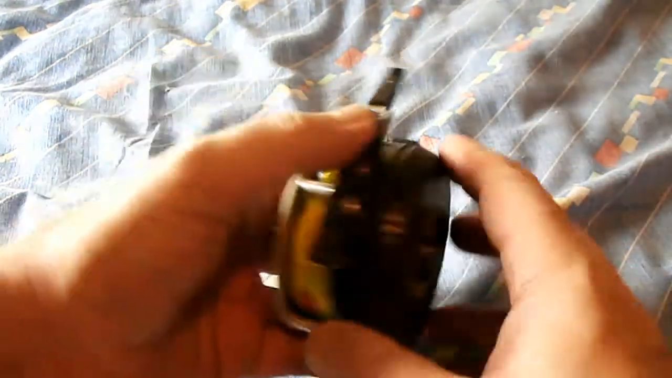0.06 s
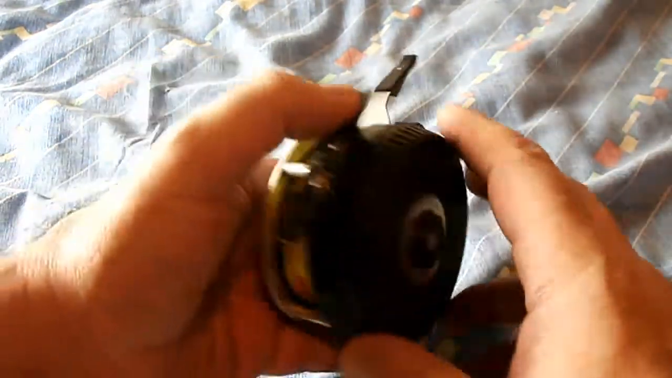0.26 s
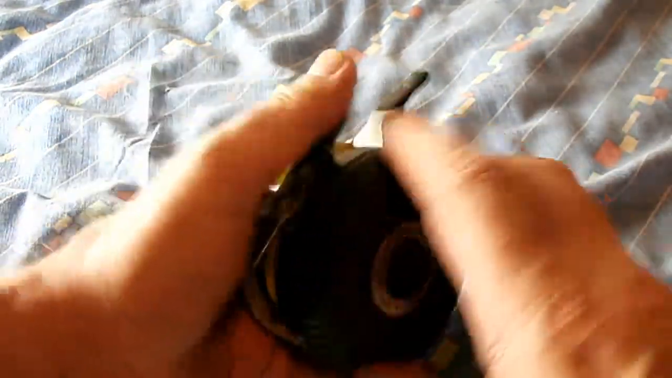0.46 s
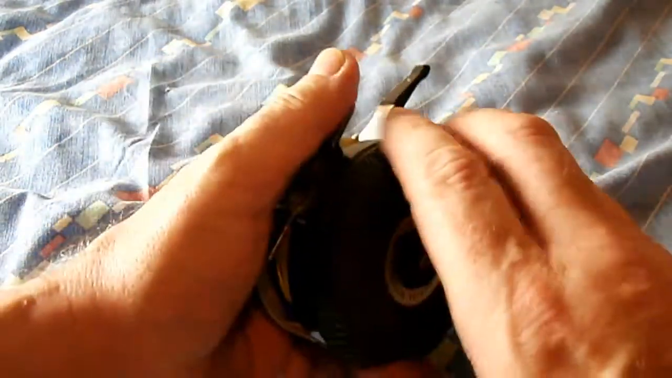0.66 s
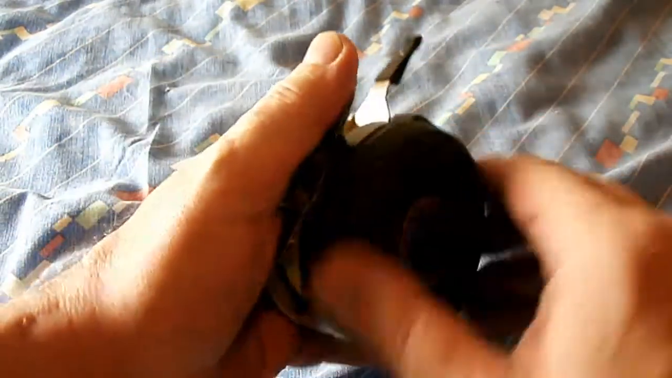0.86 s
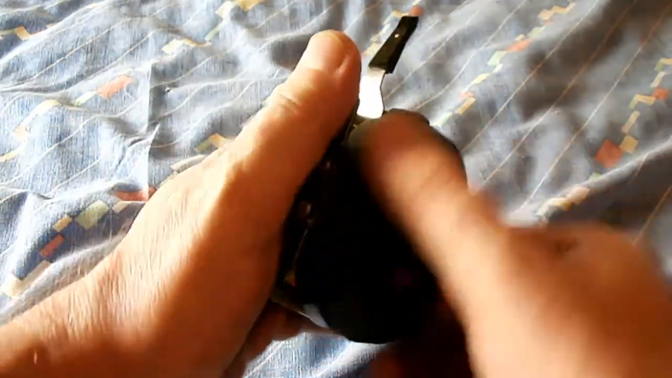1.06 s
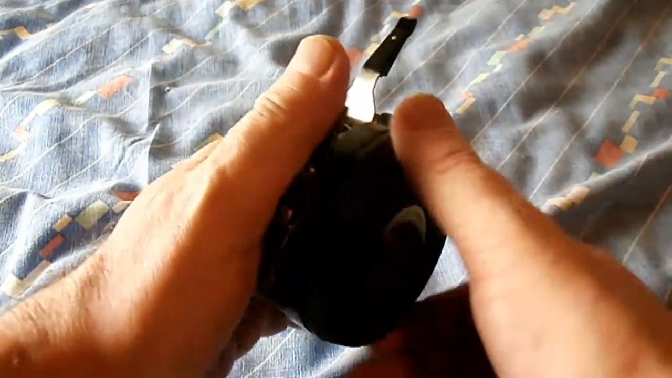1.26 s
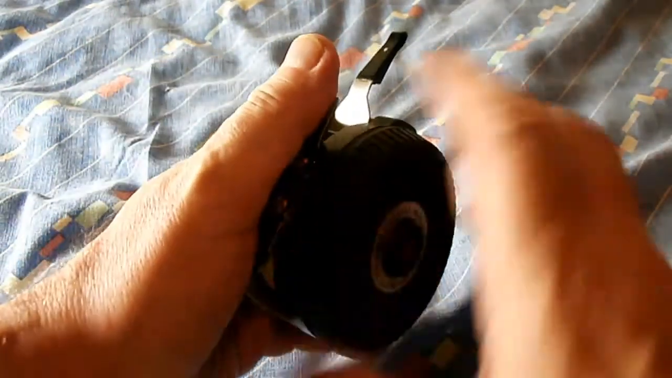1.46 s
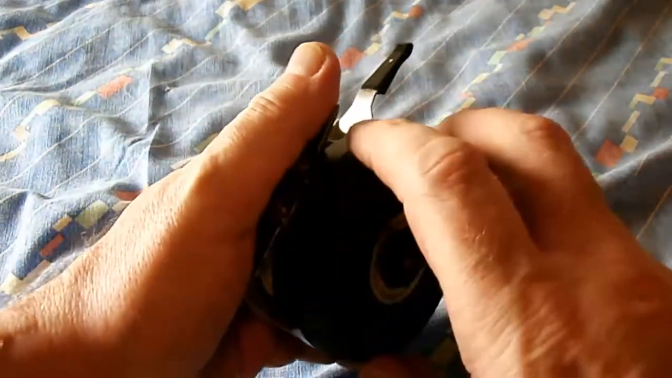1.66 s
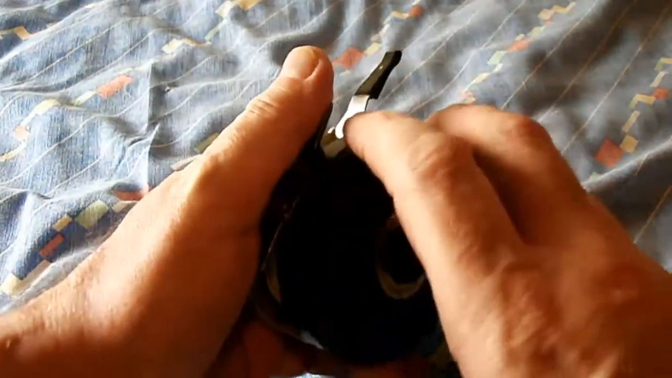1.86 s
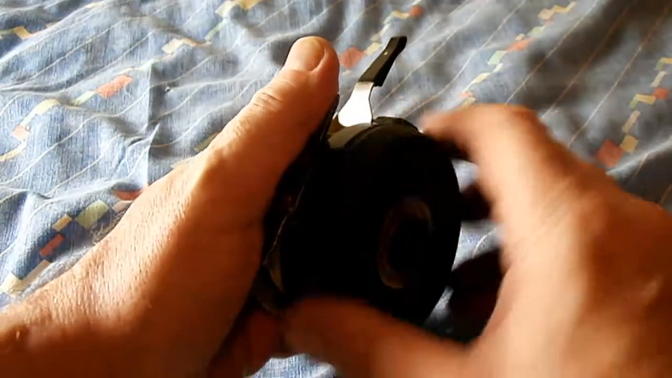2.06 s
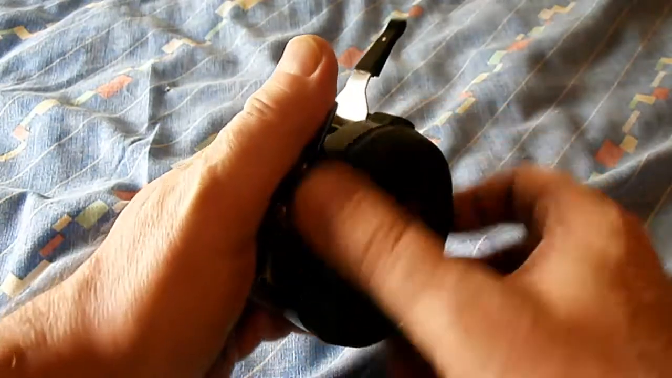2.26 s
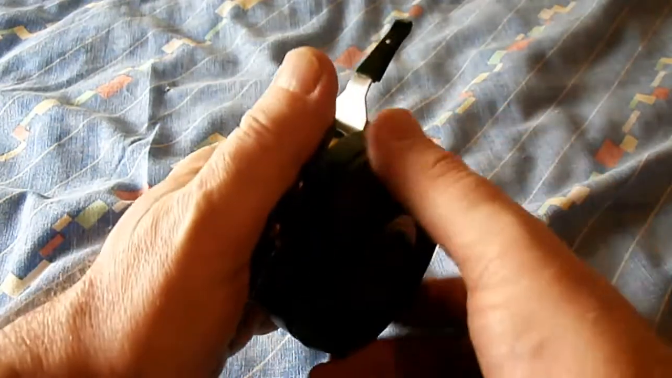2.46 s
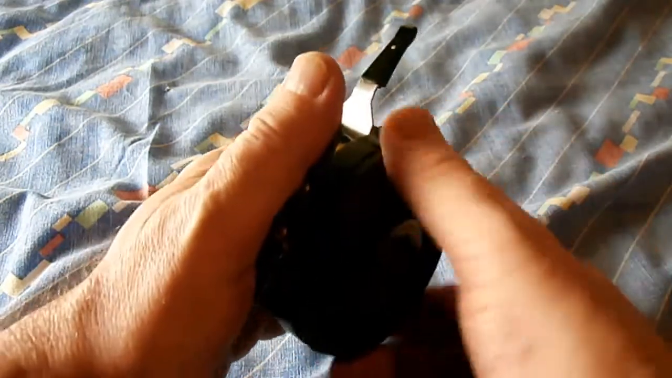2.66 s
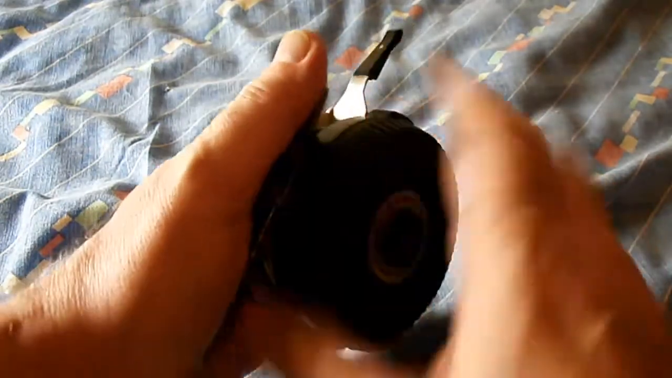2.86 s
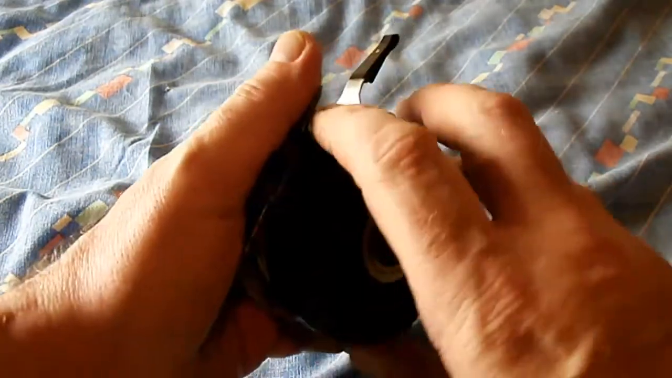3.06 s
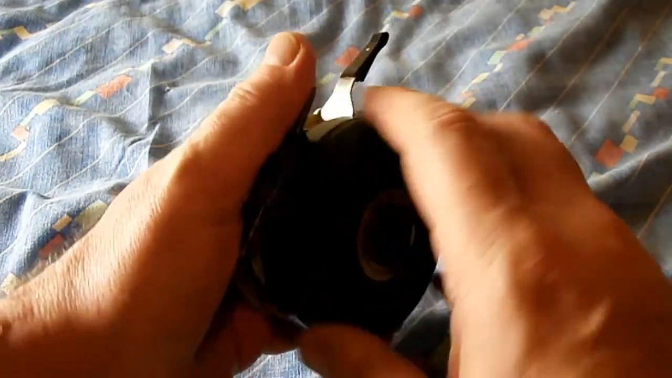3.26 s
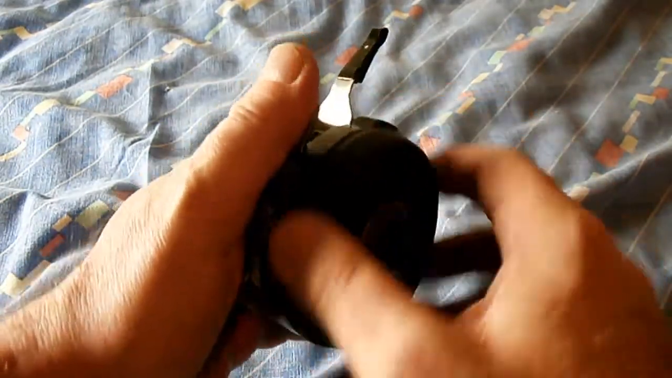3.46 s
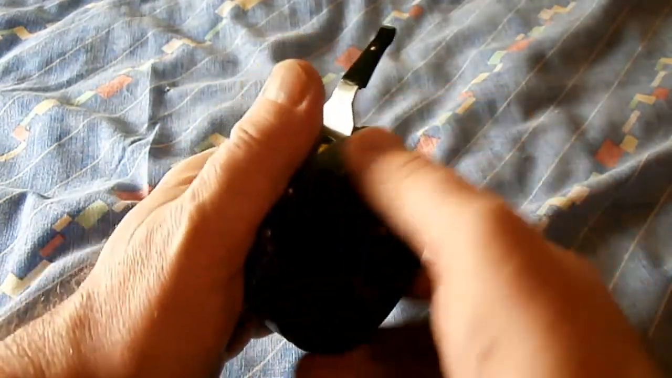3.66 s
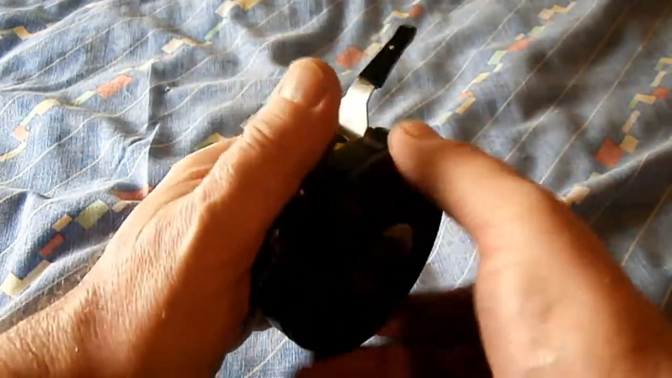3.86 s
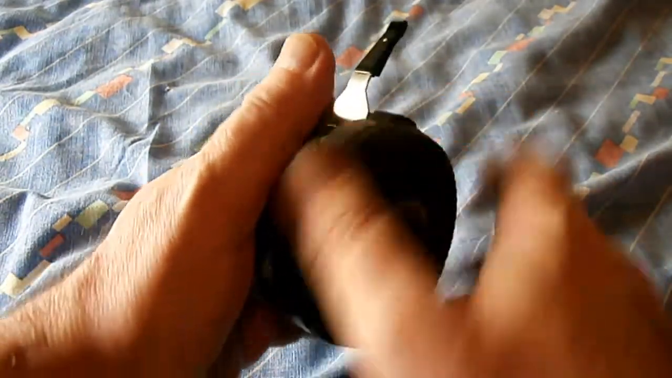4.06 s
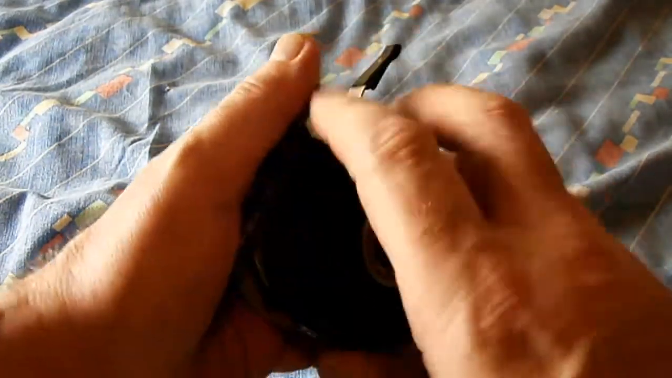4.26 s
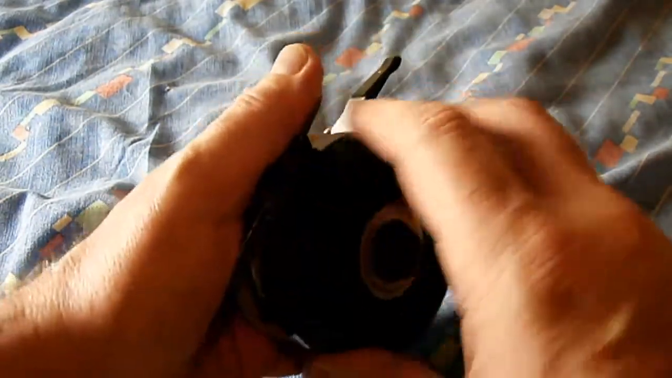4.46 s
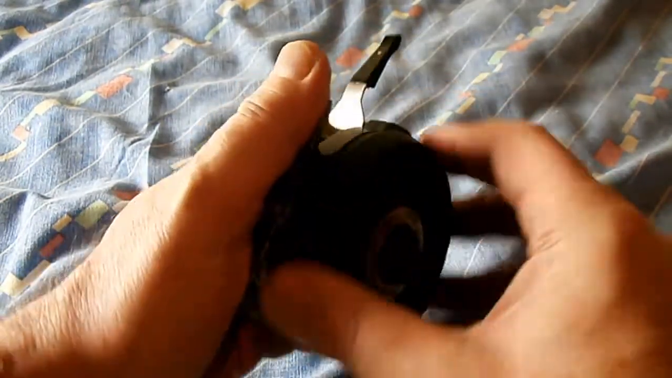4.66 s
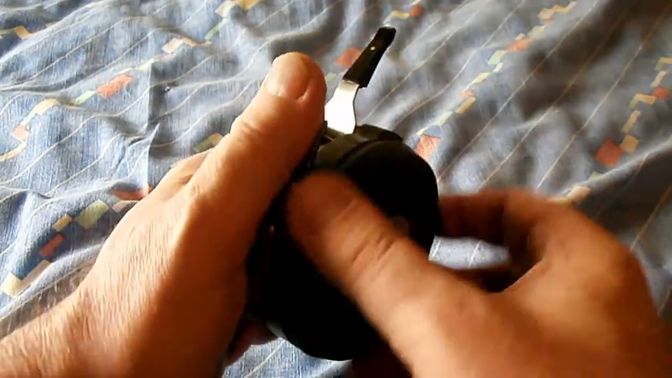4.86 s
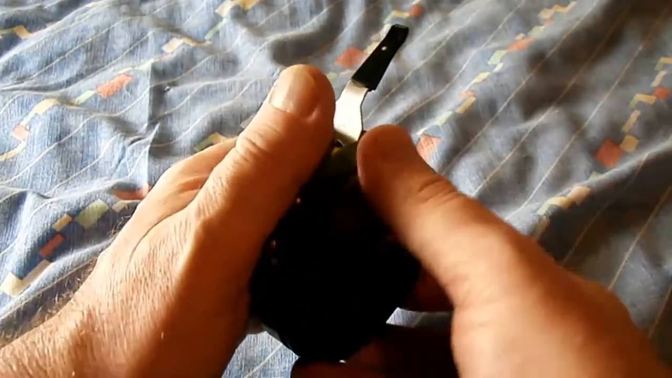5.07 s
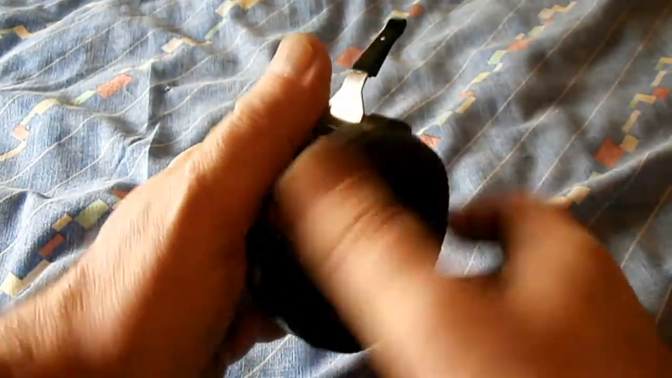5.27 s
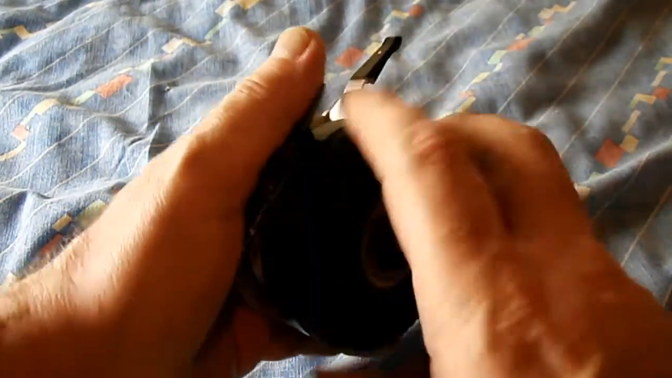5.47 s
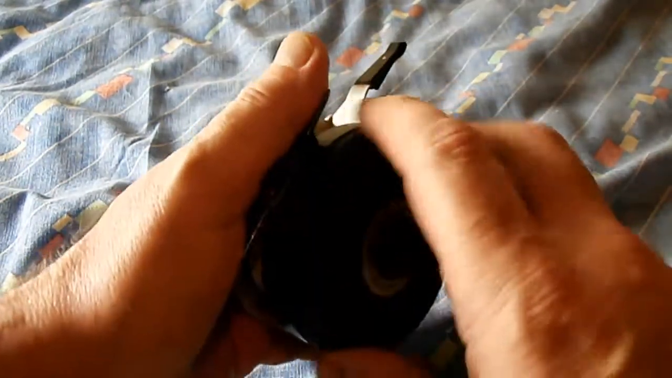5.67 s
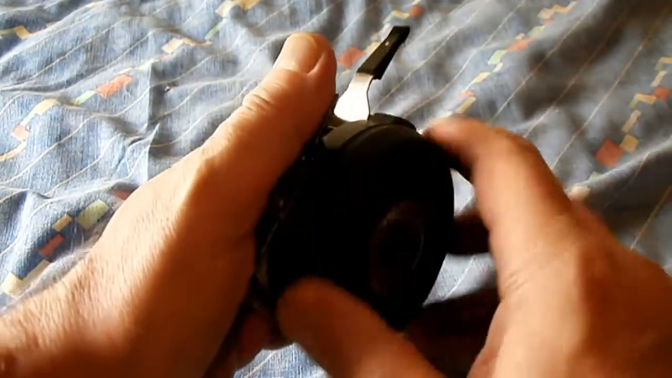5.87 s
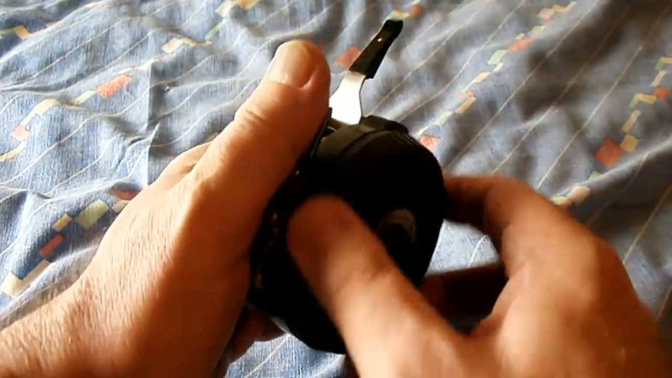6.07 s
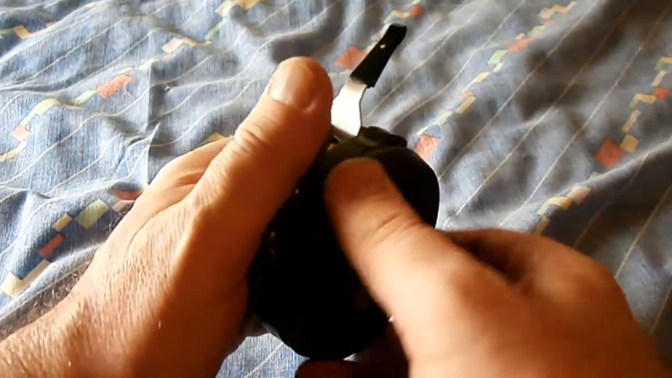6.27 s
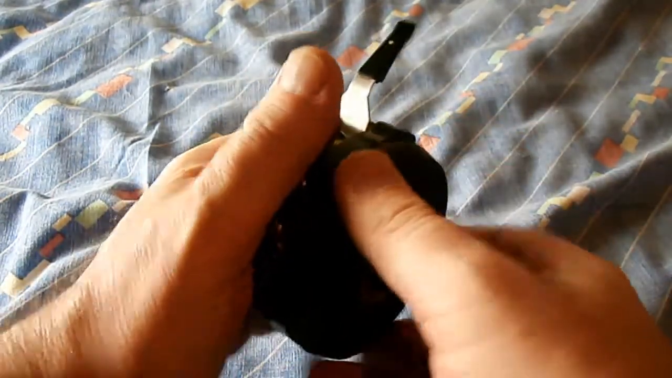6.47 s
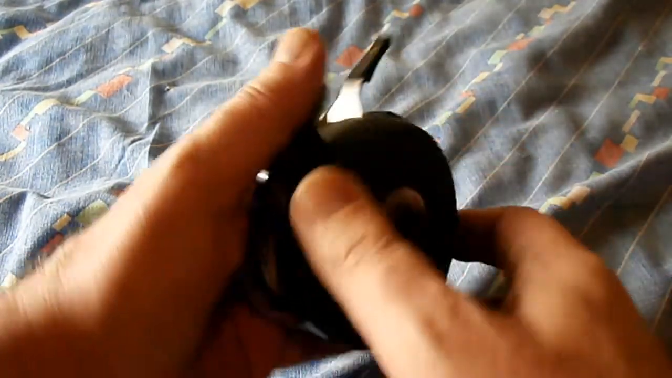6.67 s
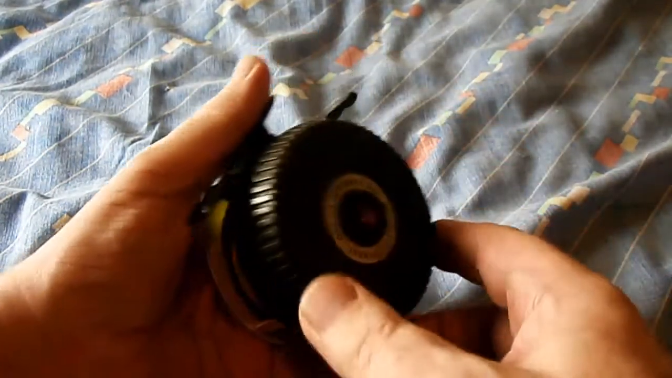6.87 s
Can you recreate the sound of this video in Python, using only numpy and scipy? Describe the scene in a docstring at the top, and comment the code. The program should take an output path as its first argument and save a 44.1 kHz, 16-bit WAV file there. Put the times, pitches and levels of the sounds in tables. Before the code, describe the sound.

Very close to a small camera microphone, a spring-driven fishing reel is turned by hand in five short bursts. Each burst is a rapid run of bright, hard steel clicks with a slight metallic ring and tiny rebound. Between bursts fingers rub the case and loose metal taps softly. The furnished room gives a short, soft echo over faint hum, hiss and a thin high whine.

```python
"""Fishing reel turned by hand

A spring-driven fishing reel is turned in five short bursts, close to a small camera in a furnished room.
A steel pawl snaps over each ratchet tooth and rebounds; the case rings at a pitch that wanders as it turns.
Fingers rub the case, and the loose case taps as the grip changes; the room adds a short, soft echo.
The microphone overloads on the snaps with a dull pop and rounded peaks, over hum, hiss and a faint camera whine."""
import sys
import numpy as np
from scipy import signal
from scipy.fft import rfft, irfft, next_fast_len
from scipy.io import wavfile
from scipy.ndimage import uniform_filter1d, map_coordinates

SR = 44100
rng = np.random.default_rng(int(sys.argv[2]) if len(sys.argv) > 2 else 0)


def int16_out(signal):
    """Quantize to a 16-bit WAV file."""
    q = np.round(np.clip(np.atleast_2d(signal).T, -1, 1) * 32767)
    wavfile.write(sys.argv[1], SR, q.astype(np.int16))


N = 305613


def amp(db):
    """Decibels to gain."""
    return 10 ** (np.asarray(db) / 20)


def unit(x):
    """Each row at rms 1."""
    return x / np.sqrt(np.mean(x ** 2, axis=-1, keepdims=True) + 1e-20)


def along(points, hz):
    """(frequency, value) points interpolated on a log frequency axis."""
    f, values = np.transpose(points)
    return np.interp(np.log(hz + 1), np.log(np.maximum.accumulate(f) + 1), values)


def add(track, s, sound):
    """Mix a sound into the track at time s."""
    start = max(0, round(s * SR))
    part = track[..., start:start + sound.shape[-1]]
    part += sound[..., :part.shape[-1]]


def filtered(x, gain):
    """x times a gain that is a function of frequency."""
    size = next_fast_len(N + 8192)
    hz = np.fft.rfftfreq(size, 1 / SR)
    return irfft(rfft(x, size) * gain(hz), size)[..., :N]


def noise(spectrum):
    """Steady coloured noise of rms 1."""
    white = rng.standard_normal(N)
    return unit(filtered(white, lambda hz: amp(along(spectrum, hz))))


def through(x, gain_db):
    """Rows of x through a minimum-phase filter with the given gain, so that nothing sounds early."""
    size = x.shape[-1]
    cepstrum = irfft(np.log(amp(gain_db)), size)
    # fold the cepstrum onto positive time
    cepstrum[..., 1:size // 2] *= 2
    cepstrum[..., size // 2 + 1:] = 0
    return irfft(rfft(x) * np.exp(rfft(cepstrum)), size)


def background():
    """Quiet room hum and microphone hiss as coloured noise, with the camera's steady tones as sines."""
    # colour of hum and hiss: (frequency [Hz], relative level [dB])
    air = [(20, -11), (50, -11.5), (90, -3.5), (150, -1.5), (300, -3.5), (600, -7.5), (1200, -13.5),
           (2200, -17.5), (4000, -18), (6000, -21.5), (8500, -18), (10100, -13.5), (12000, -24.5),
           (15500, -19)]
    # steady tones: (frequency [Hz], rms level [dB])
    whine = [(120, -95), (3261, -78), (3399, -83.5), (4066, -84), (14890, -84), (14947, -61),
             (15004, -71.5), (15175, -85)]
    t = np.arange(N) / SR
    tones = np.zeros(N)
    for hz, db in whine:
        tones += amp(db) * np.sqrt(2) * np.sin(2 * np.pi * (hz * t + rng.random()))
    return amp(-60.5) * noise(air) + tones


def room(x, build_s, count):
    """Reflections build up, then die at a rate set by pitch; they change as the hands move."""
    # decay of the reflections: (frequency [Hz], t60 [s])
    decay = [(200, 0.1), (1500, 0.17), (3500, 0.24), (7300, 0.19), (10000, 0.19), (15000, 0.14)]
    out = np.zeros(N)
    slice_size = N // count + 1
    # each slice of the input gets a fresh random tail
    for start in np.arange(count) * slice_size:
        hz, age, cells = signal.stft(rng.standard_normal(SR // 3), SR, nperseg=256)
        fade = amp(-60 * age / along(decay, hz)[:, None])
        build = 1 - np.exp(-age / build_s)
        tail = signal.istft(cells * fade * build, SR, nperseg=256)[1]
        tail = tail / np.linalg.norm(tail)
        add(out, start / SR, signal.fftconvolve(x[start:start + slice_size], tail))
    return out


def rubbing(grain_db, grain_rate):
    """The drum slides under the fingers: the contact catches and slips in tiny grains of noise."""
    # strokes: (start [s], end [s], level [dB])
    rubs = [(0.33, 0.38, -66), (1.087, 1.148, -45), (1.919, 1.962, -53), (2.226, 2.328, -52),
            (2.81, 2.848, -61), (3.143, 3.218, -59), (3.796, 3.955, -62), (4.02, 4.133, -63.5),
            (4.434, 4.493, -58), (4.793, 5.035, -50.5), (5.135, 5.16, -44.5), (5.17, 5.22, -61),
            (5.32, 5.354, -60.5), (5.64, 5.693, -59), (6.438, 6.505, -52.5)]
    # colour of the sliding: (frequency [Hz], relative level [dB])
    slide = [(200, -17), (600, 0.5), (1000, 3.5), (1500, -3), (2300, 0), (3200, 9.5), (4500, 0), (7200, 4),
             (9000, -2), (15000, -26)]
    t = np.arange(N) / SR
    stroke = np.zeros(N)
    for start, end, db in rubs:
        # 23 ms ramps, half open at the start and end times
        stroke += amp(db) * np.clip(np.minimum(t - start, end - t) / 0.023 + .5, 0, 1)
    grains = map_coordinates(rng.standard_normal(N), [t * grain_rate], order=1)
    return stroke * unit(noise(slide) * amp(grain_db * grains))


def contacts(rows, rebound_s, ring_width_hz, steel_width_hz=700, steel_peak_db=6, size=1024):
    """One chattering blow and rebound per row, filtered as steel, case, knock and edge: (direct, to the room)."""
    # colours of the four parts: (frequency [Hz], relative level [dB])
    steel_colour = [(3700, -28.5), (4500, -4), (5000, -7), (5300, -1), (5560, -5), (5870, -3), (6350, -5),
                    (6950, 3), (7400, 0.5), (8100, -2.5), (8650, -0.5), (9400, -8), (10800, -23.5)]
    case_band = [(2100, -21.5), (2750, -5), (3100, 3.5), (4400, 0), (5200, -4), (6500, -31.5)]
    knock_colour = [(60, -60), (300, -27), (560, -6.5), (800, -1.5), (1100, 2), (1450, -6.5), (1950, 5.5),
                    (2500, 5), (3100, -7), (4500, -48)]
    edge_colour = [(8000, -29.5), (9300, 3), (10100, 7), (10650, 10), (11500, 1.5), (12800, -4),
                   (14300, -0.5), (15500, 0.5), (16500, -15)]
    # how steel, case, knock and edge are driven: (chatter t60 [s], typical rebound level [dB])
    drive = [(0.012, -17.5), (0.01, -27), (0.0093, -25), (0.0046, -13.5)]
    db, steel_hz, case_hz, ring_db, knock_db, edge_db = np.transpose(rows)[:, :, None]
    t, hz = np.arange(size) / SR, np.fft.rfftfreq(size, 1 / SR)

    # neighbouring contacts are struck in a similar way
    chatter = signal.lfilter([1], [1, -.75], rng.standard_normal((len(rows), size)), axis=0)
    late, strong = rng.standard_normal((len(rows), 2)).T[:, :, None]
    rebound_t = t - rebound_s * np.exp(0.13 * late)

    def blow(since, t60):
        since = np.maximum(since, 0)
        return amp(-60 * since / t60) * (1 - np.exp(-since / 0.00028))

    def peak(centre, width):
        return 1 / (1 + (2 * (hz - centre) / width) ** 2)

    # each row places the strongest resonances of steel and case
    steel = along(steel_colour, hz) + steel_peak_db * peak(steel_hz, steel_width_hz)
    case = along(case_band, hz) + 20 * np.log10(peak(case_hz, ring_width_hz))
    parts = [(0, steel), (ring_db, case), (knock_db, along(knock_colour, hz)), (edge_db, along(edge_colour, hz))]

    direct, power = 0, 0
    for (level_db, colour), (t60, rebound_db) in zip(parts, drive):
        rebound = amp(rebound_db + 2.2 * strong) * blow(rebound_t, t60)
        force = chatter * (blow(t, t60) + rebound)
        # even out the coarse spectrum of the random force, so each contact keeps its colour
        smooth_power = uniform_filter1d(np.abs(rfft(force)) ** 2, size=25)
        lumps_db = 10 * np.log10(np.abs(smooth_power) + 1e-9)
        gain = amp(db + level_db)
        direct = direct + gain * unit(through(force, colour - lumps_db))
        power = power + size * (gain * unit(amp(colour))) ** 2
    # summed over all directions the ripple averages out, so the room is fed a smooth pulse
    spread = through(signal.unit_impulse(size), 10 * np.log10(power))
    return np.stack([direct, spread], axis=1)


def taps(thump_hz=440, thump_t60=0.019, ringing_db=3):
    """Duller contacts of the loose case as the grip changes: it rings on and its hollow body thumps."""
    # taps: (time [s], steel rms level [dB], thump level before its onset and decay [dB])
    tap_events = [(2.626, -50.5, -46), (3.8715, -57.5, -49), (4.1223, -65.5, -56), (5.1483, -41.5, -43.5),
                  (5.159, -53, -65), (5.242, -61.5, -55), (5.4394, -67, -60), (6.452, -45.5, -31.5),
                  (6.4792, -46, -60), (6.495, -56.5, -48), (6.5373, -62.5, -65), (6.726, -64, -61)]
    # ringing of the case: (frequency [Hz], typical relative level [dB], t60 [s])
    case_modes = [(1190, -12, 0.032), (2170, -14, 0.13), (2150, -8, 0.0067), (3360, -2, 0.068),
                  (7400, -7, 0.026)]
    # all taps, levels relative to steel: (steel [Hz], case [Hz], case ring [dB], knock [dB], sharp edge [dB])
    tap_colour = (6200, 3400, 1, -4.5, -19.5)
    track, t = np.zeros((2, N)), np.arange(SR // 5) / SR
    thump = np.sin(2 * np.pi * thump_hz * t) * amp(-60 * t / thump_t60) * (1 - np.exp(-t / 0.00094))
    blows = [(steel_db, *tap_colour) for _, steel_db, _ in tap_events]
    sounds = contacts(blows, rebound_s=0.0037, ring_width_hz=2400)
    for (s, steel_db, thump_db), tap in zip(tap_events, sounds):
        ring = np.zeros(len(t))
        for hz, db, t60 in case_modes:
            ring += amp(db + rng.normal(0, 1.8) - 60 * t / t60) * np.sin(2 * np.pi * hz * t)
        add(track, s, tap)
        add(track, s, amp(steel_db + ringing_db) * ring + amp(thump_db) * thump)
    return track


def ratchet(pop_s=0.00042, undershoot=0.32, undershoot_s=0.0007):
    """The pawl drops off one tooth after another, with a dull pop under each snap as the microphone overloads."""
    # the pawl drops off a tooth: (time [s], steel rms level [dB])
    pawl = [(0.6649, -29.5), (0.6908, -29), (0.7122, -30.5), (0.7316, -32), (0.751, -31.5), (0.7696, -34),
            (0.7887, -31.5), (0.8069, -33), (0.8257, -30), (0.8433, -33.5), (0.8625, -33.0),
            (0.8841, -30.5), (0.913, -31.0), (0.942, -29.5), (0.9677, -29.5), (0.9921, -29.5),
            (1.0152, -31), (1.0365, -30), (1.0548, -36), (1.0701, -34.5), (1.0849, -38.5), (1.1012, -43),
            (1.121, -38.5), (1.158, -36.5), (1.237, -57.5), (1.9502, -25.5), (1.9707, -29), (1.989, -30),
            (2.0078, -31), (2.0286, -31.5), (2.0493, -33.5), (2.0704, -33.0), (2.0941, -31.5),
            (2.1244, -31), (2.1536, -29.5), (2.1815, -29.5), (2.209, -35.5), (2.238, -52.5), (2.254, -48.5),
            (2.2773, -51), (2.305, -50), (2.3604, -28), (2.388, -28), (2.4224, -27), (2.4794, -25.5),
            (2.563, -25.5), (3.193, -26.0), (3.2247, -29), (3.2528, -30), (3.2785, -32.5), (3.3032, -29.5),
            (3.3259, -33), (3.3485, -31), (3.3714, -32), (3.3949, -30), (3.4175, -32), (3.441, -30.5),
            (3.466, -31), (3.493, -30), (3.518, -31.0), (3.5429, -30), (3.566, -29.5), (3.587, -30),
            (3.6083, -33), (3.637, -32.5), (3.6653, -32.5), (3.6942, -31.0), (3.729, -31), (3.7731, -31),
            (3.8592, -45), (4.4771, -25), (4.5058, -27.5), (4.5371, -29), (4.5651, -30), (4.59, -30),
            (4.617, -30.5), (4.647, -30.5), (4.6743, -31.5), (4.704, -29.5), (4.7467, -29), (4.7848, -30),
            (4.8193, -33.0), (4.8327, -58), (5.0021, -34), (5.6815, -25), (5.7078, -28.5), (5.743, -30.5),
            (5.774, -31), (5.8033, -30), (5.8374, -30.5), (5.87, -29.5), (5.902, -30), (5.9342, -31),
            (5.9723, -30.5), (6.017, -27.5), (6.0659, -25.5), (6.11, -25.5), (6.1611, -25.5),
            (6.2155, -26.5), (6.2809, -26.0)]
    # colour of the snaps as the grip on the case shifts, levels relative to the steel:
    # (time [s], case pitch [Hz], case ring [dB], knock [dB], sharp edge [dB], dull overload pop [dB])
    turn = [(0.67, 3970, -1.5, -8.5, -5.5, -7), (0.75, 3600, -6, -21, -9.5, -26),
            (0.91, 3350, -11.5, -22, -12, -30), (1.09, 3510, -8, -21, -7.5, -34),
            (1.1, 3440, -4, -11, -3, -7), (1.16, 3330, -4, -12.5, -14.5, -19),
            (1.95, 3280, -8.5, -17.5, -11, -26), (2.01, 4200, -13.5, -25, -6, -28),
            (2.07, 4100, -5.5, -15, -7, -39), (2.18, 3600, -8.5, -28, -11, -14),
            (2.21, 3370, -3, -19.5, -18, -19), (2.36, 3470, -11, -23.5, -10.5, -18),
            (2.56, 3220, -8.5, -18, -10, -5.5), (3.19, 3750, -7.5, -17, -7, -11),
            (3.23, 3800, -0.5, -17, -4.5, -3), (3.44, 3340, -9, -23.5, -5.5, -33),
            (3.52, 4200, -13, -16, -9, -5.5), (3.54, 3460, -9, -22, -9, -26),
            (3.57, 3340, -14, -21, -9, -17), (3.77, 3890, -3.5, -14, -8.5, -24),
            (4.48, 3430, -11.5, -20, -10.5, -25), (4.54, 3600, -7, -15, -6.5, -15),
            (4.67, 4100, -7, -14, -6, -32), (4.7, 3650, -9, -17.5, -12, -11),
            (5.0, 3800, -8.5, -15.5, -21, -11), (5.68, 3300, -9, -20.5, -8, -5),
            (5.74, 3650, -0.5, -15.5, -7.5, -10), (5.97, 3990, -2, -16, -8.5, 3),
            (6.02, 3810, -6, -22, -7.5, -19), (6.07, 3870, -13.5, -16.5, -8.5, -8),
            (6.28, 3840, -12.5, -21.5, -9, -5)]
    # strongest resonance of the pawl, and its relative change from tooth to tooth
    steel_centre_hz, steel_scatter = 7390, 0.072
    # snaps under this level are duller: dB more ring and knock for each dB less
    soft_db, soft_ring, soft_knock = -31.5, 0.22, 0.47
    track, t = np.zeros((2, N)), np.arange(SR // 200) / SR

    def bump(width_s):
        return np.exp(-((t - 2 * width_s) / width_s) ** 2) * pop_s / width_s

    # a slight undershoot keeps the pop from booming
    pulse = bump(pop_s) - undershoot * bump(undershoot_s)
    times, db = np.transpose(pawl)
    knots, *controls = np.transpose(turn)
    case_hz, ring_db, knock_db, edge_db, pop_db = [np.interp(times, knots, control) for control in controls]
    softness_db = np.maximum(soft_db - db, 0)
    ring_db = ring_db + soft_ring * softness_db
    knock_db = knock_db + soft_knock * softness_db
    steel_hz = steel_centre_hz * np.exp(steel_scatter * rng.standard_normal(len(times)))
    blows = np.column_stack([db, steel_hz, case_hz, ring_db, knock_db, edge_db])
    snaps = contacts(blows, rebound_s=0.00334, ring_width_hz=1050)
    for s, pop, snap in zip(times, amp(db + pop_db), snaps):
        add(track, s, snap)
        add(track, s, pop * pulse)
    return track


def scene():
    """The reel in its room: direct sound, echo and background."""
    # sound that reaches the room: (frequency [Hz], gain [dB])
    radiated = [(200, -40), (2000, -15), (3600, -18), (5000, -14), (7100, -13), (9000, -15), (12000, -19.5),
                (15000, -16)]
    direct, spread = rubbing(grain_db=4.5, grain_rate=680) + taps() + ratchet()
    to_room = filtered(spread, lambda hz: amp(along(radiated, hz)))
    echo = room(to_room, build_s=0.018, count=48)
    return (background() + echo + direct)[None]


def record(dry, top_db=-14, knee=4, top_hz=16000):
    """The microphone rounds off the loud peaks; then the camera's steep band limit removes the top."""
    rounded = dry / (1 + np.abs(dry / amp(top_db)) ** knee) ** (1 / knee)
    return filtered(rounded, lambda hz: 1 / np.sqrt(1 + (hz / top_hz) ** 160))


dry = scene()
out = record(dry)
int16_out(out)
```